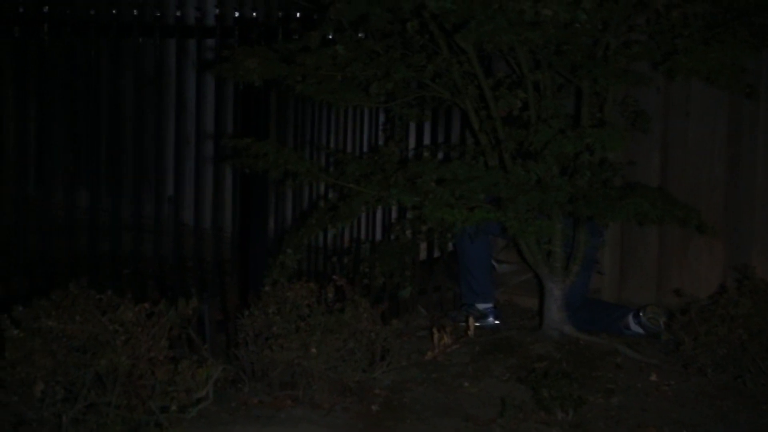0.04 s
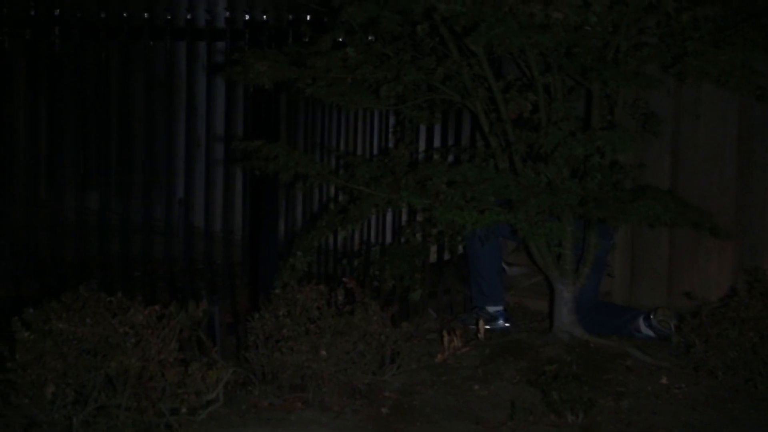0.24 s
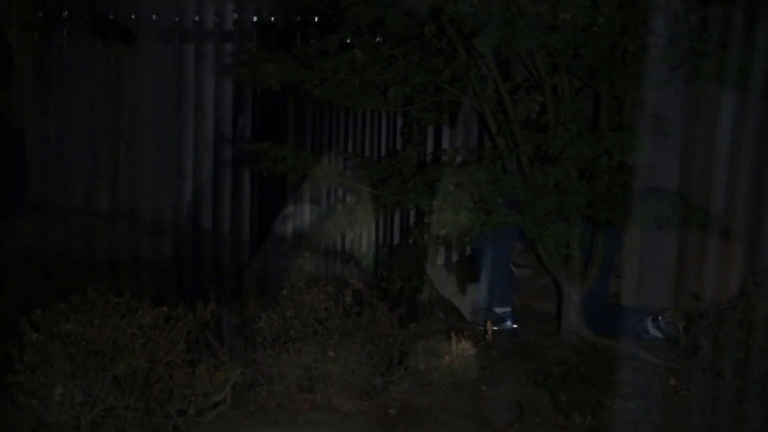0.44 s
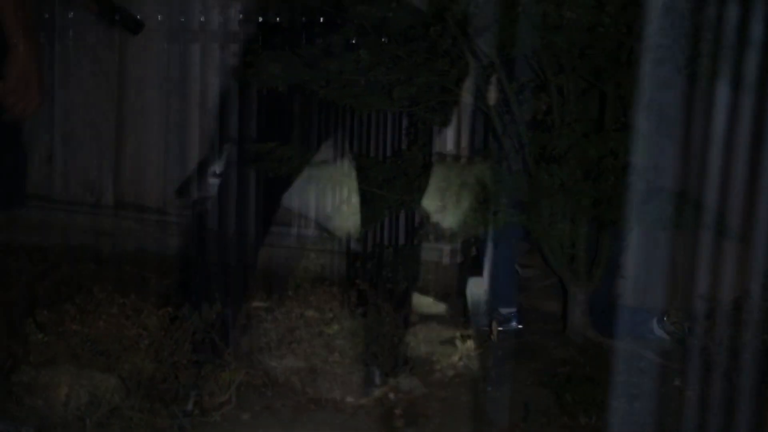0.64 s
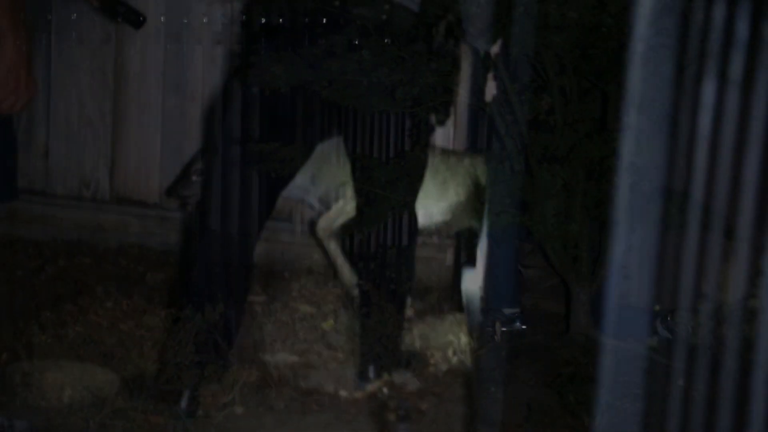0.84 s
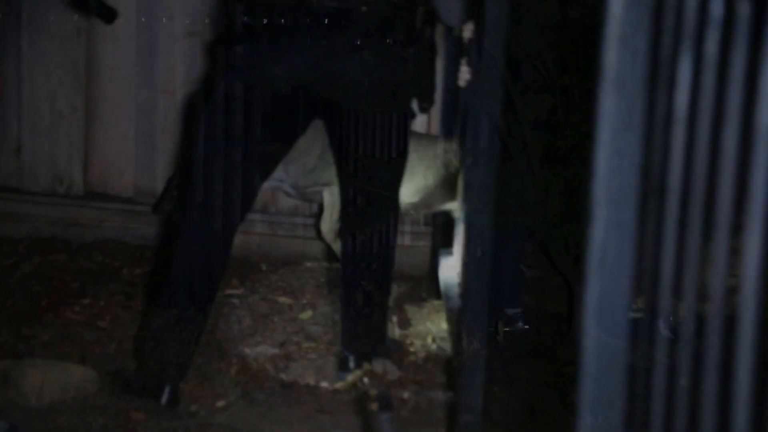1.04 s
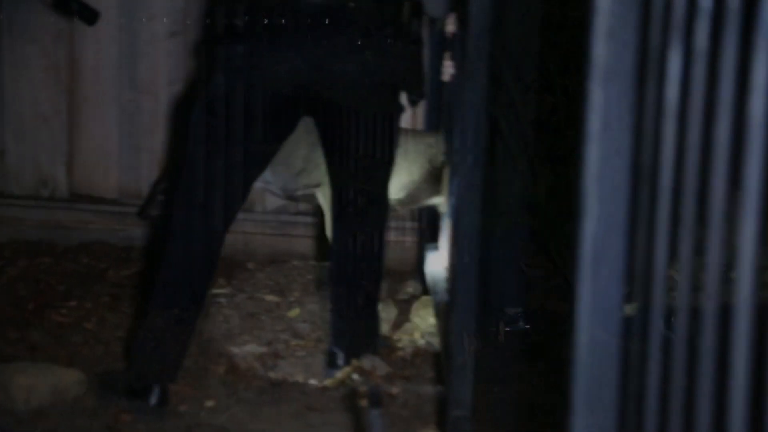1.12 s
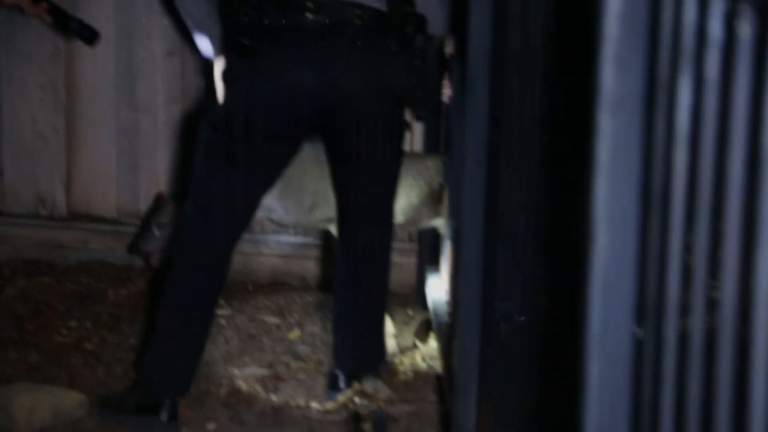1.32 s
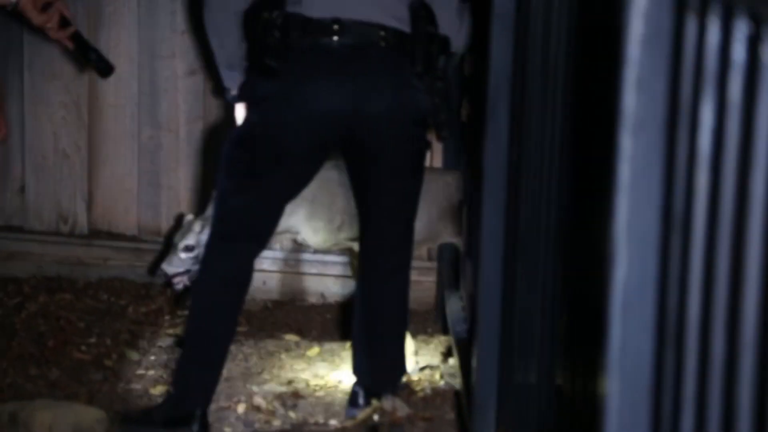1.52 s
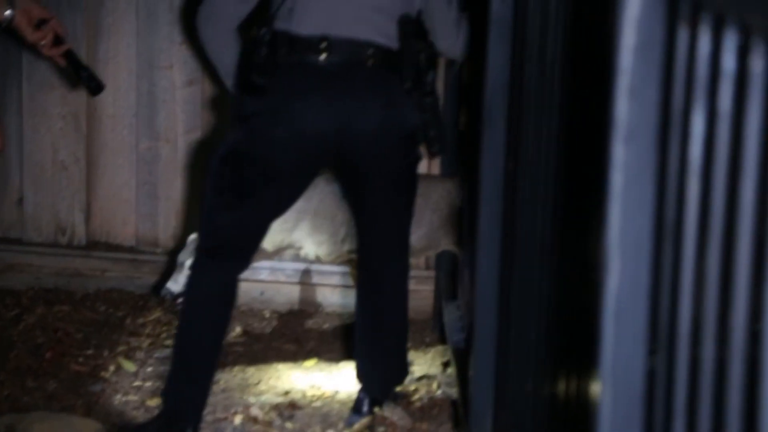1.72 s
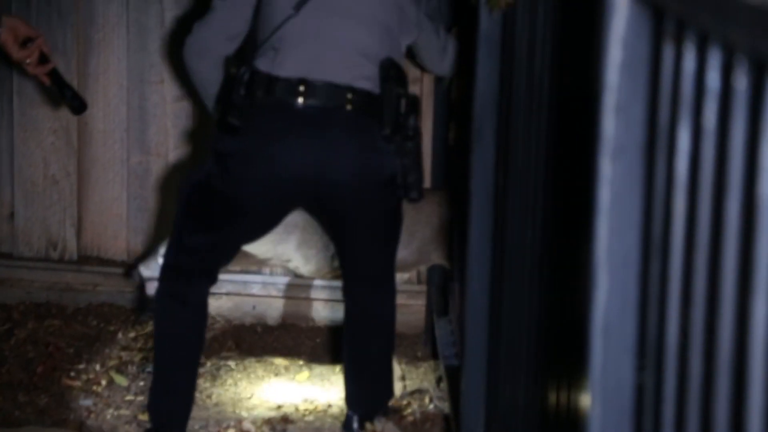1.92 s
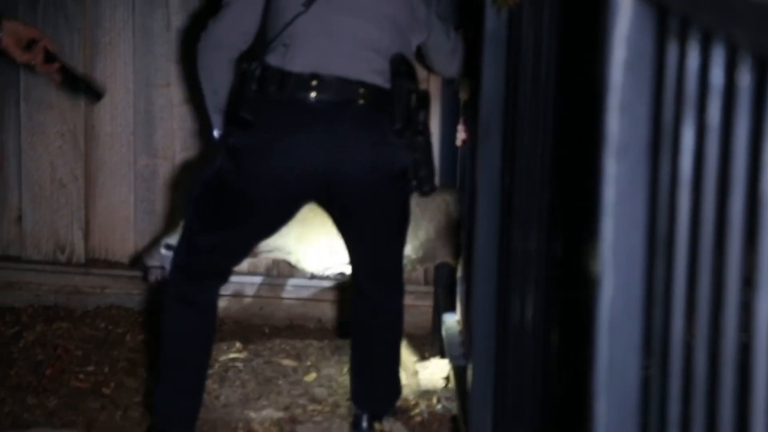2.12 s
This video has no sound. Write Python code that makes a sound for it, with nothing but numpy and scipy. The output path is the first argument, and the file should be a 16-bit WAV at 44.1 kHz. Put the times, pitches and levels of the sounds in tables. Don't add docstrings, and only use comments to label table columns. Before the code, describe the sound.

One sustained deer cry, raspy and blaring, swells from hushed outdoor night air just after a dull knock on wood; it wavers in tone beside fences, clipped hard by a close microphone, and lasts to the end.

```python
import sys
import numpy as np
from scipy import signal
from scipy.fft import rfft, irfft
from scipy.io import wavfile

SR = 44100
rng = np.random.default_rng(int(sys.argv[2]) if len(sys.argv) > 2 else 0)


def to_wav(s):
    ch = np.atleast_2d(s).T
    pcm = np.round(np.clip(ch, -1, 1) * 32767)
    wavfile.write(sys.argv[1], SR, pcm.astype(np.int16))


def voltage_ratio(level):
    return 10 ** (np.asarray(level, float) / 20)


N = 95741

# t/s, pitch f/Hz, upper resonance f/Hz, effort over the overload point level/dB,
# mouth opening level/dB
BLEAT_PATH = [(0.469,217.8,1950,0,-7), (0.564,236.5,1920,2.5,-10.5), (0.626,254.1,1910,9.5,-21),
              (0.641,274.7,2130,7.5,-21), (0.718,281.6,1980,4.5,-15.5), (0.832,288.2,2082,-1,-3.5),
              (0.9,299,1920,6.5,-23.5), (0.948,295.2,2107,4.5,-10), (1.032,288.7,2140,-2.5,-2),
              (1.152,297.3,1900,5,-11), (1.272,302.4,2120,5.5,-13.5), (1.362,311,2006,4.5,-6),
              (1.429,315.6,2180,8.5,-24), (1.52,314.7,2032,12,-21.5), (1.64,305.3,1976,2,-5),
              (1.782,300.4,1900,3.5,-6.5), (2.057,286.8,1945,1,-3.5), (2.17,271.7,1818,5,-13)]
# t/s, half length t/s, level/dB
LOW_CANCELS = [
    (0.578, 0.0064, -12.5),
    (0.627, 0.0044, -11.5),
    (0.786, 0.0049, -10),
    (0.83, 0.012, -8),
    (0.956, 0.019, -6),
    (1.096, 0.053, -9),
    (1.351, 0.019, -13),
    (1.651, 0.032, -16.5),
    (2.009, 0.042, -3.5),
    (2.077, .01, -3),
]
# t/s, half length t/s, near f/Hz, level/dB
PARTIAL_SWELLS = [(0.576, 0.013, 1060, 1), (0.676, 0.035, 3400, 21), (0.814, .03, 1130, 7),
                  (.93, 0.061, 295, 10.5), (1.027, 0.053, 1150, 14), (1.065, 0.074, 2063, 5),
                  (1.24, 0.066, 600, 8.5), (1.249, 0.053, 3890, 14), (1.343, 0.044, 1230, 9.5),
                  (1.35, 0.01, 1527, 11.5), (1.367, 0.082, 3000, 11.5), (1.355, 0.073, 2526, 3.5),
                  (1.635, 0.063, 2140, -8), (1.75, .05, 2434, 4), (1.828, 0.4, 600, 7.5),
                  (1.894, 0.078, 1180, 8), (2.046, 0.017, 2580, 12), (2.045, 0.013, 2010, -37),
                  (2.09, 0.022, 2000, 6), (2.103, 0.023, 275.6, 6), (0.849, 0.033, 290, -5),
                  (1.044, 0.098, 290, 0), (1.054, 0.023, 1450, -2), (1.095, 0.028, 590, 2),
                  (0.536, 0.012, 2066, 6.5), (1.71, 0.084, 1520, -36), (1.726, 0.039, 300, -10),
                  (1.991, 0.048, 290, -19), (2.066, 0.034, 1430, 9), (0.52, 0.036, 2580, -5)]
# t/s, half length t/s, extra rasp level/dB
VOICE_CATCHES = [
    (.575, .01, 5),
    (.626, .012, 14),
    (.82, .02, 2),
    (.96, .02, 4),
    (1.2, .04, 6),
    (1.355, .02, 5),
    (1.5, .1, -9),
    (1.66, .02, 4),
    (1.8, .06, -6),
    (2.075, .01, 16),
]
# f/Hz, width f/Hz, level/dB
WEAK_RESONANCES = [
    (300, 290, -27),
    (600, 180, -26.5),
    (1232, 450, -19),
    (2620, 640, -19.5),
    (3730, 1090, -28),
    (5790, 840, -33),
    (8030, 3800, -40.5),
]
# delay t/s, level/dB
FENCE_ECHOES = [
    (.011, -15),
    (.019, -16),
    (.031, -17),
    (.047, -19),
    (.068, -21),
]
# f/Hz, level/dB
NIGHT_COLOUR = [
    (15,-65),
    (60,3),
    (140,-2),
    (400,-11.5),
    (1500,-24),
    (2150,-24),
    (2500,-31),
    (15500,-42),
]
# f/Hz, level/dB, time to fall 60 dB t/s
KNOCK_TONES = [
    (430, 0, .05),
    (640, -3, .04),
    (215, -2, .09),
]


def bleat():
    low_hz, low_width_hz, upper_width_hz = 893.5, 261, 544
    jitter, wobble = .0008, .002
    shimmer_db, flicker_db = 1.3, 4.5
    mouth_share = .4
    t = np.arange(N) / SR
    path_s, *columns = np.transpose(BLEAT_PATH)
    pitch, upper_hz, effort_db, mouth_db = [np.interp(t, path_s, c) for c in columns]
    unsteady = 1 + jitter * drift(28) + wobble * drift(11.7)
    phase = 2 * np.pi * np.cumsum(pitch * unsteady) / SR
    late_db = np.interp(t, [path_s[0], .729], [-9, 0])
    low, upper = np.zeros(N), np.zeros(N)
    for k in range(1, 27):
        hz = k * pitch
        lag = np.arctan(2 * (hz - low_hz) / low_width_hz)
        ring = hump(hz, low_hz, low_width_hz) * np.sin(k * phase - lag)

        weight = hump(hz, upper_hz, upper_width_hz) * voltage_ratio(mouth_db)
        for centre_hz, width_hz, db in WEAK_RESONANCES:
            weight += voltage_ratio(db + mouth_share * (mouth_db + 2.5)) * hump(hz, centre_hz, width_hz)

        swells = [(at, half, db) for at, half, near_hz, db in PARTIAL_SWELLS
                  if round(near_hz / np.interp(at, path_s, columns[0])) == k]
        swell = voltage_ratio(passing_db(t, swells))
        flicker = shimmer_db * drift(2.9) if k < 10 else flicker_db * drift(7) + late_db
        tone = np.sin(k * phase + rng.uniform(0, 2 * np.pi))
        low += swell * ring
        upper += swell * weight * voltage_ratio(flicker) * tone
    low *= voltage_ratio(passing_db(t, LOW_CANCELS))
    return voltage_ratio(effort_db) * (low + fences(upper + rasp(t, phase)))


def rasp(t, phase):
    level_db = -38 + passing_db(t, VOICE_CATCHES)
    return voltage_ratio(level_db) * band_noise(400, 4000) * (1 + np.sin(phase))


def fences(x):
    t = np.arange(N) / SR
    return x + sum(voltage_ratio(db) * np.interp(t - delay, t, x) for delay, db in FENCE_ECHOES)


def overload(x):
    flat = .73 * np.clip(x, -1, 1)
    flank = np.abs(np.gradient(flat))
    grit_size = flank + .3 * flank.mean()
    highpass = signal.butter(1, 6000, "high", fs=SR)
    grit = signal.lfilter(*highpass, grit_size * rng.standard_normal(N))
    return flat + voltage_ratio(-42) * rms_one(grit)


def yard():
    return voltage_ratio(-32) * band_noise(25, 120)


def night():
    hz = np.maximum(np.arange(N // 2 + 1) * SR / N, 1)
    colour_hz, colour_db = np.transpose(NIGHT_COLOUR)
    shape_db = np.interp(np.log(hz), np.log(colour_hz), colour_db)
    air = irfft(rfft(rng.standard_normal(N)) * voltage_ratio(shape_db), N)
    return voltage_ratio(-40.5 + 1.25 * drift(6.3)) * rms_one(air) - knock()


def knock():
    start_s, rise_s, level_db = .4003, .0017, -27
    age = np.maximum(np.arange(N) / SR - start_s, 0)
    ring = sum(voltage_ratio(level_db + db - 60 * age / t60) * np.sin(2 * np.pi * f * age)
               for f, db, t60 in KNOCK_TONES)
    return np.tanh(age / rise_s) * ring


def rms_one(x):
    return x / np.sqrt(np.mean(x ** 2))


def drift(rate):
    r = np.exp(-2 * np.pi * rate / SR)
    wander = signal.lfilter([1], [1, -2 * r, r * r], rng.standard_normal(N + SR))
    return rms_one(wander[SR:])


def hump(hz, centre_hz, width_hz):
    return 1 / (1 + (2 * (hz - centre_hz) / width_hz) ** 2) ** 1.416


def passing_db(t, events):
    return sum(db * np.exp(-((t - at) / half) ** 2) for at, half, db in events)


def band_noise(bottom_hz, top_hz):
    band = signal.butter(2, [bottom_hz, top_hz], "band", fs=SR, output="sos")
    return rms_one(signal.sosfilt(band, rng.standard_normal(N)))


def scene():
    fade_start_s, fade_s = .47, 1
    progress = np.clip((np.arange(N) / SR - fade_start_s) / fade_s, 0, 1)
    turn = np.pi / 2 * progress
    mix = np.sin(turn) * overload(bleat() + yard()) + np.cos(turn) * night()
    return mix[None]


def low_pass(x):
    return signal.sosfilt(signal.butter(12, 15890, fs=SR, output="sos"), x)


def record(dry):
    return low_pass(dry)


dry = scene()
out = record(dry)
to_wav(out)
```